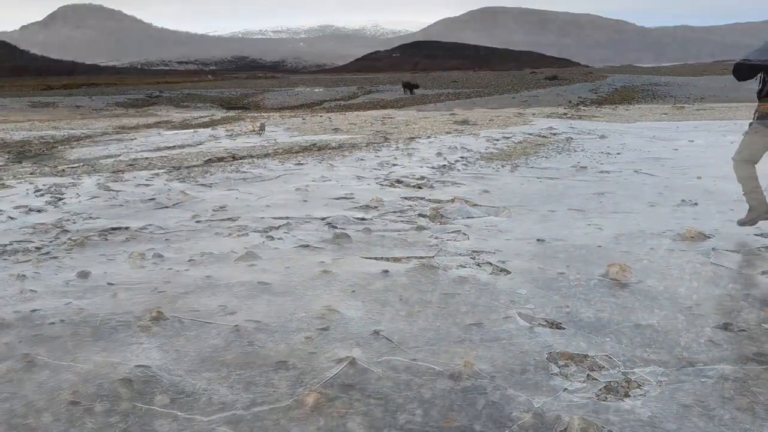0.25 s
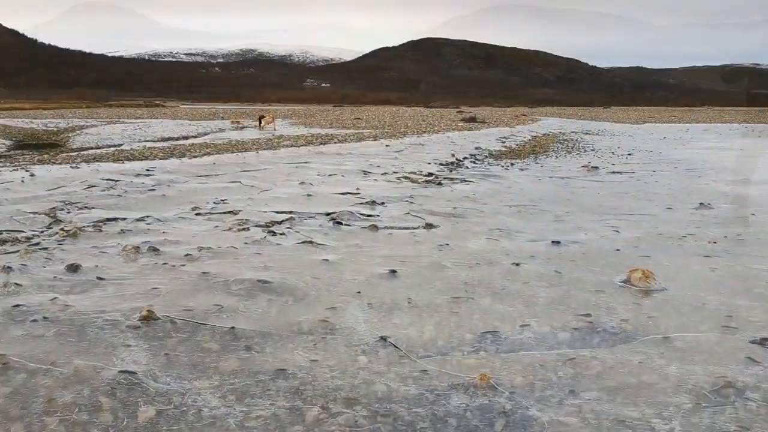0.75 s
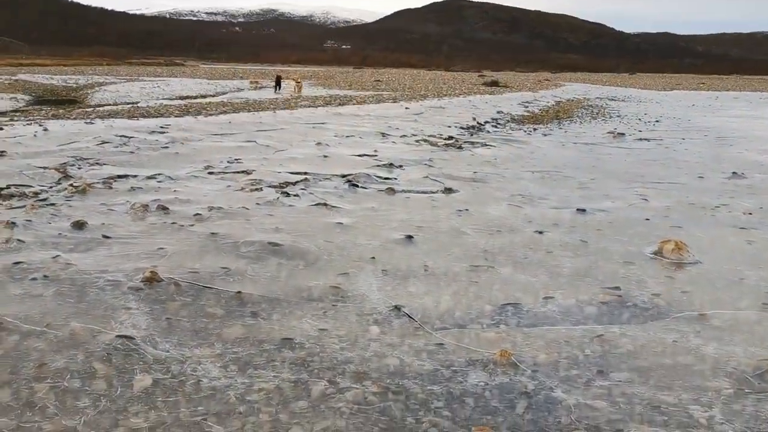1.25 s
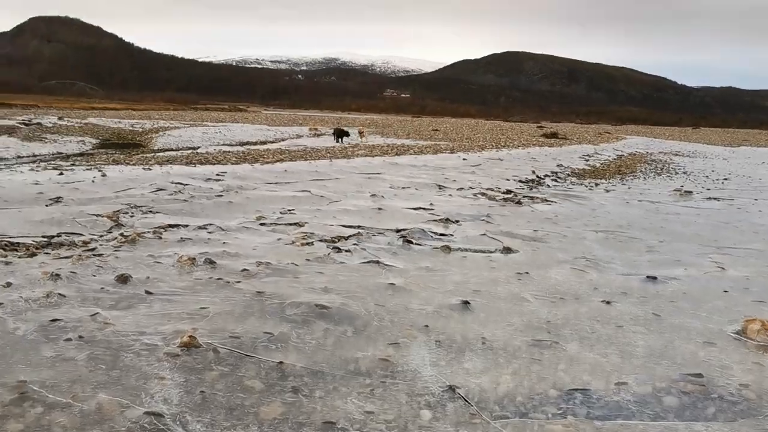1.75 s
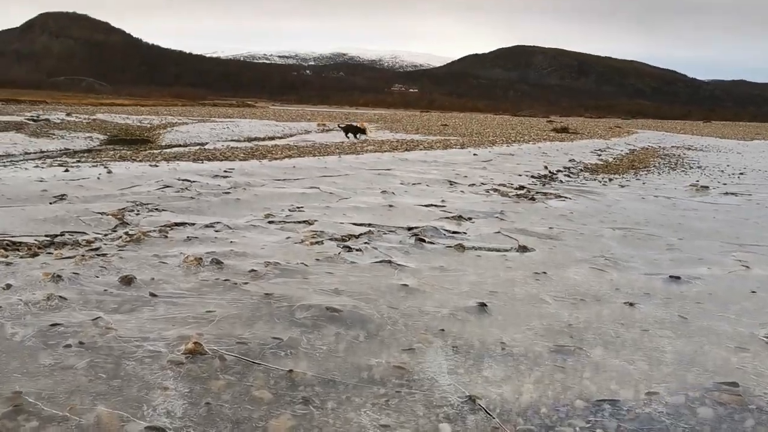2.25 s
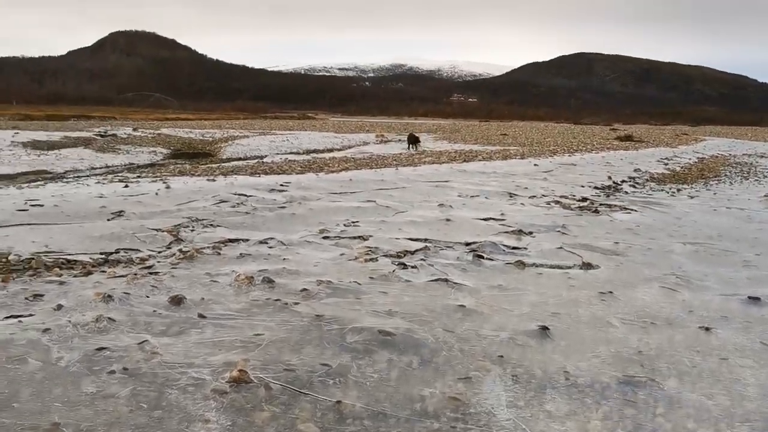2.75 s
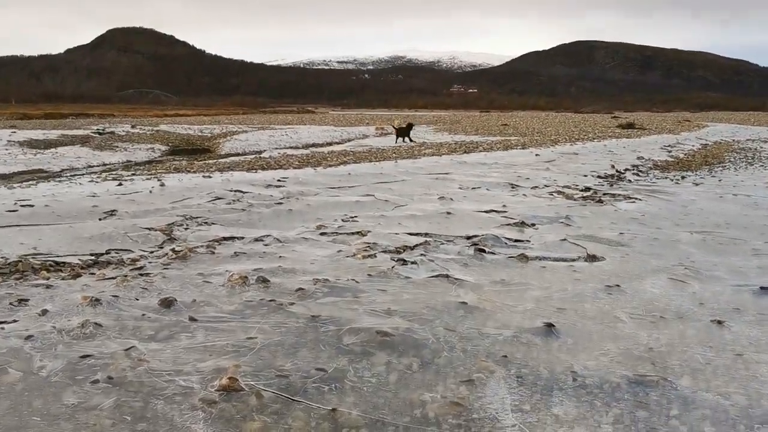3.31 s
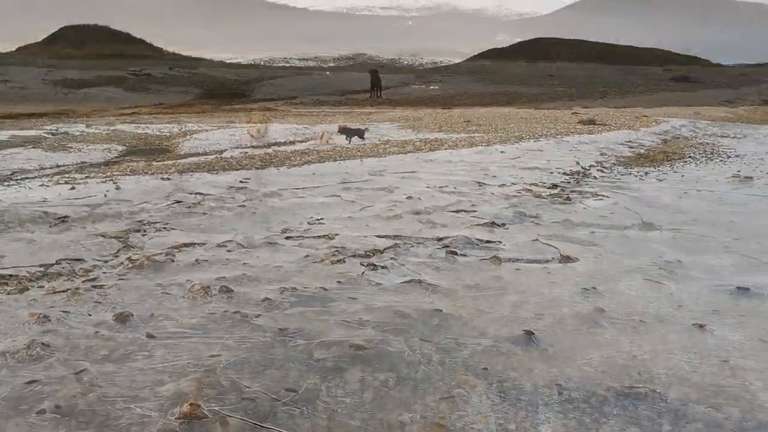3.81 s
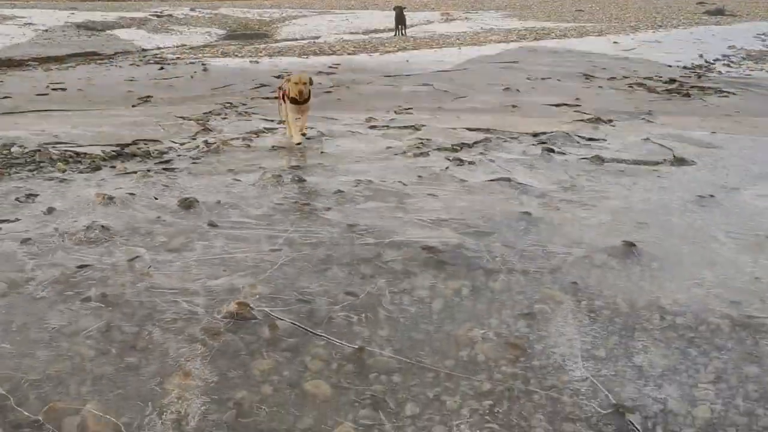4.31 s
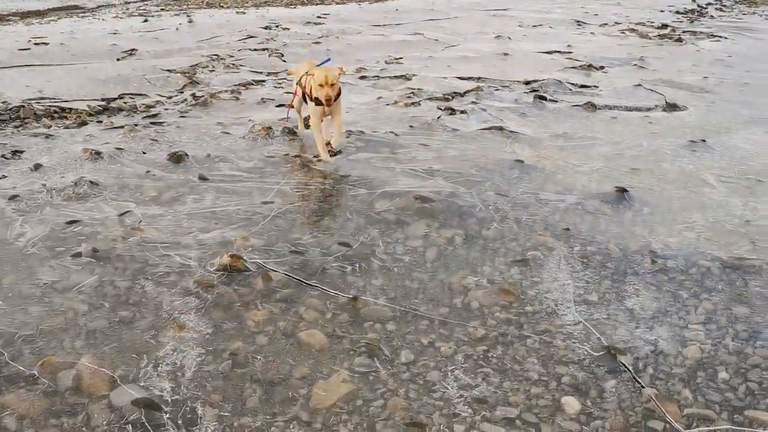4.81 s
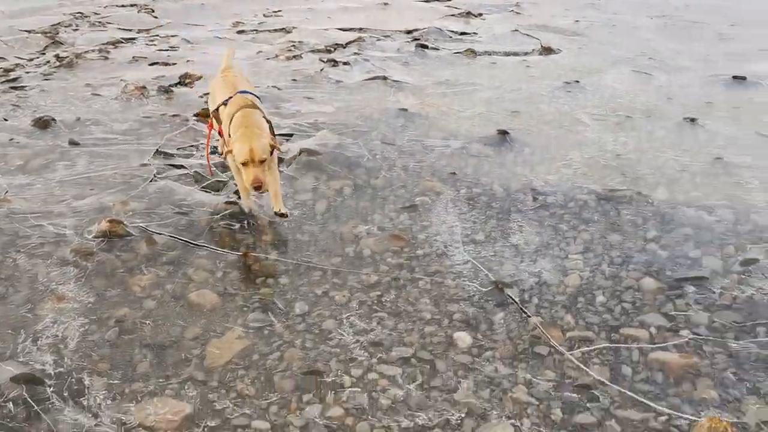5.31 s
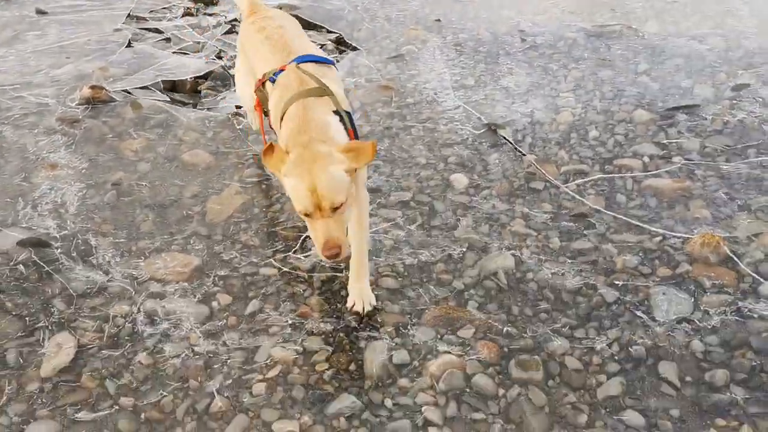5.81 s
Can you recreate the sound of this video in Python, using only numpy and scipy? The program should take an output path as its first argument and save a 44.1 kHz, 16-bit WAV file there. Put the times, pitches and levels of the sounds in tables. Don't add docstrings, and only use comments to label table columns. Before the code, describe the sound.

Thin ice over shallow water cracks and crunches under a walker's boots close by, then splinters more lightly and brightly under a dog's paws.

```python
import sys
import numpy as np
from scipy import signal
from scipy.fft import rfft, irfft, next_fast_len
from scipy.io import wavfile
from scipy.ndimage import uniform_filter1d, map_coordinates

SR = 44100
rng = np.random.default_rng(int(sys.argv[2]) if len(sys.argv) > 2 else 0)


def transcribe(u):
    v = np.clip(np.atleast_2d(u).T, -1, 1)
    q = np.round(v * 32767).astype(np.int16)
    wavfile.write(sys.argv[1], SR, q)


def gain_from_decibels(decibels):
    exponent = np.asarray(decibels, float) / 20
    return 10 ** exponent


N = 267246

HANDOVER = (4, 4.05)

# [t/s, peak level/dB, f/Hz]
BOOT_SLABS = [(0.221, -30, 1330), (0.418, -23.5, 1010), (0.453, -20.5, 816), (0.475, -17.5, 880),
              (0.712, -18.5, 1060), (0.833, -21.5, 1380), (0.872, -24.5, 970), (0.901, -27.5, 804),
              (1.26, -21, 1230), (1.294, -24, 1460), (1.377, -8, 1100), (1.434, -16.5, 1010),
              (1.557, -21, 1670), (1.607, -19, 1090), (1.671, -24, 1105), (1.926, -15, 1030),
              (2.043, -20, 1580), (2.213, -21.5, 1070), (2.236, -24.5, 990), (2.283, -24.5, 1080),
              (2.354, -24.5, 1330), (2.407, -17, 824), (2.434, -10, 1010), (2.55, -19.5, 820),
              (2.668, -20, 810), (2.905, -24, 920), (3.065, -37, 920), (3.451, -19, 1190),
              (3.461, -15, 860), (3.55, -14.5, 1200)]
# [t/s, peak level/dB, f/Hz]
BOOT_CHIPS = [(0.061, -33, 3000), (0.326, -40, 2700), (0.391, -29, 4250), (0.672, -19.5, 4230),
              (1.324, -24, 1700), (1.347, -10, 3975), (1.455, -11.5, 1960), (1.707, -22, 2030),
              (1.773, -26.5, 2220), (1.84, -10, 3900), (2.108, -20, 4100), (2.196, -30.5, 4510),
              (2.574, -23.5, 3020), (2.711, -19.5, 3150), (2.803, -26, 2110), (2.855, -33.5, 2930),
              (2.958, -30.5, 3630), (3.006, -24.5, 2560), (3.117, -36, 2780), (3.146, -32, 3630),
              (3.246, -37.5, 3890), (3.406, -23, 4300), (3.512, -17, 2530), (3.67, -21, 4080),
              (3.696, -16, 4550), (3.737, -21, 2570), (3.882, -25, 2130), (3.895, -26.5, 3440),
              (3.918, -33, 2870), (.264, -46, 6500), (.312, -46, 3710), (1.4424, -18, 1110),
              (1.599, -28, 3830), (1.9096, -23, 1030), (2.341, -34, 4160), (2.393, -38, 3750),
              (2.516, -26, 4650), (2.7816, -33, 1000), (2.8936, -33, 970), (3.4997, -24, 1160)]
# [t/s, peak level/dB, f/Hz]
FROST_SPLINTERS = [
    (.0233, -35, 7550),
    (.0468, -40, 8440),
    (.0792, -35, 9440),
    (.1416, -35, 6860),
    (.1815, -42, 7150),
]
# [t/s, peak level/dB, shard f/Hz]
LATER_CRACKS = [(1.3634, -13, 1210), (1.8553, -11, 3570), (1.864, -10.5, 4080), (1.8744, -12, 3680),
                (1.9545, -19, 4020), (2.4697, -13, 4000), (3.5976, -13.5, 4120), (4.7034, -22, 1370),
                (5.2623, -18, 3110), (5.2782, -17, 4530), (5.288, -16, 2320), (5.3258, -16, 3360),
                (5.6167, -15, 3250), (5.3794, -14.5, 2400), (5.5394, -19, 3760), (5.5794, -23, 3400),
                (5.6456, -16.5, 3290)]
# [t/s, peak level/dB, f/Hz, time to fall 60 dB/s]
PAW_BREAKS = [(4.033, -28.5, 3740, .033), (4.074, -25, 2650, .03), (4.141, -29.5, 2950, .039),
              (4.204, -33, 3470, .044), (4.42, -29, 3410, .06), (4.515, -23.5, 4480, .052),
              (4.636, -21.5, 4570, .044), (4.872, -30, 2810, .048), (4.925, -19, 4020, .044),
              (4.958, -21, 3990, .046), (4.979, -22, 4200, .03), (5.034, -18, 3030, .034),
              (5.07, -19, 3930, .038), (5.247, -14, 3180, .038), (5.364, -16.5, 3220, .052),
              (5.515, -15.5, 3600, .056), (5.795, -14.5, 4500, .056), (5.82, -17.5, 3930, .03),
              (5.932, -16, 4800, .034), (5.964, -15, 4740, .09)]
# [t/s, peak level/dB, f/Hz]
BOOT_HAIRLINES = [(0.0962, -41, 3560), (0.3414, -46, 1280), (0.4688, -21, 921), (0.4844, -19, 991),
                  (0.5087, -17, 3440), (0.5264, -17, 3480), (0.6355, -25, 1360), (0.6964, -18, 1150),
                  (0.7627, -28, 2730), (0.7874, -37, 4580), (0.814, -26, 1100), (0.9462, -37, 3930),
                  (1.0116, -35, 4190), (1.1019, -43, 886), (1.1722, -37, 2030), (1.5179, -24, 1990),
                  (1.7404, -37, 2080), (1.8804, -17, 1040), (2.0038, -24, 4510), (2.0637, -26, 3110),
                  (2.0807, -28, 4420), (2.17, -30, 2890), (2.4134, -14, 947), (2.4414, -14, 1080),
                  (2.4534, -14, 1940), (2.4584, -12, 1060), (2.4864, -19, 797), (2.607, -33, 939),
                  (2.6953, -20, 3220), (2.7387, -24, 2760), (2.7616, -32, 3150), (2.9387, -28, 3390),
                  (3.1797, -41, 2680), (3.1906, -37, 3340), (3.3184, -48, 2830), (3.4664, -17, 762),
                  (3.5344, -14, 1150), (3.5664, -17, 972), (3.5808, -12, 1590), (3.6164, -21, 3400),
                  (3.6334, -25, 4530), (3.6446, -25, 3520), (3.8082, -36, 4410), (3.8571, -29, 2040)]
# [t/s, peak level/dB, f/Hz]
PAW_HAIRLINES = [(3.9963, -40, 3900), (4.0223, -28, 5050), (4.1001, -28, 4330), (4.129, -30, 5050),
                 (4.1544, -28, 4330), (4.1934, -29, 3630), (4.2374, -28, 4270), (4.3246, -33, 5080),
                 (4.374, -30, 2730), (4.4957, -25, 3890), (4.5334, -26, 2020), (4.5531, -31, 4410),
                 (4.5654, -29, 2070), (4.587, -27, 4960), (4.6059, -33, 3110), (4.9062, -19, 2850),
                 (5.1158, -18, 4170), (5.1414, -19, 2880), (5.1751, -21, 2110), (5.4196, -20, 2110),
                 (5.4444, -21, 3650), (5.5648, -17, 3130), (5.7638, -25, 3910), (5.8974, -14, 4390),
                 (6.0227, -27, 4640)]
# [t/s, peak level/dB, f/Hz, time to fall 60 dB/s]
PAW_CRUSHES = [
    (5.318, -12.5, 3400, .04),
    (5.606, -12, 3250, .05),
    (5.712, -10, 4100, .04),
    (5.864, -11, 4500, .1),
]

# [start t/s, swell/s, crunch level/dB, time to fall 60 dB/s, fizz level over crunch/dB]
BOOT_STEPS = [(0, .02, -49, .5, -3), (.385, .15, -29.5, .5, -18), (.545, .04, -39, .25, -2),
              (.61, .08, -32.5, .3, -8), (1.345, .015, -24, .3, -19), (1.375, .02, -24, .3, -21),
              (1.43, .02, -33, .5, -21), (1.5, .13, -35, .33, -19), (1.838, .02, -22.5, .3, -30),
              (1.9, .03, -36, 1.1, -22), (2.095, .024, -36.5, .26, -19), (2.2, .037, -42, .12, -17),
              (2.27, .095, -42, .2, -32), (2.406, .05, -24, .3, -25), (2.54, .03, -46, 1.5, -20),
              (2.655, .03, -35.5, .45, -21), (2.885, .03, -39, .35, -15), (3.444, .155, -26.5, .18, -23),
              (3.63, .04, -40, .65, -30)]
# [start t/s, swell/s, crunch level/dB, time to fall 60 dB/s, fizz level over crunch/dB]
PAW_STEPS = [(4.018, .04, -43, .7, -20), (4.13, .09, -40, 1.1, -17), (4.41, .12, -39, .6, -18),
             (4.625, .03, -36, .35, -16), (4.69, .05, -40, .25, -20), (4.864, .08, -36, .7, -16),
             (5.027, .05, -28.5, 1.3, -22), (5.243, .04, -29, .5, -24), (5.355, .02, -26.5, .3, -24),
             (5.41, .03, -28.5, .5, -24), (5.49, .03, -26, .35, -25), (5.555, .02, -29.5, .4, -25),
             (5.635, .025, -27.5, .45, -25), (5.77, .05, -31, .4, -16), (5.856, .04, -23.5, .12, -16),
             (5.96, .015, -30, .4, -9)]
# [start t/s, swell/s, crunch level/dB, time to fall 60 dB/s, fizz level over crunch/dB]
SETTLING = [
    (.82, .04, -46, 1.6, -26),
    (3.845, .03, -40, .35, -25),
]

# [t/s, peak level/dB, f/Hz, time to fall 60 dB/s]
THUDS = [(0.058, -31, 92, 0.11), (0.383, -23.5, 260, 0.067), (0.593, -27.5, 286, 0.08),
         (1.338, -10, 270, 0.049), (1.343, -17, 105, 0.16), (1.475, -30, 188, 0.08),
         (1.834, -14, 187.6, 0.068), (2.105, -18.5, 226, 0.08), (2.218, -27, 127, 0.052),
         (2.401, -16.5, 201, 0.095), (2.683, -25, 314, 0.088), (3.441, -9, 257, 0.076),
         (3.447, -18, 115, 0.17), (3.501, -12.5, 275, 0.063), (4.918, -27, 223, 0.13),
         (5.028, -24, 199, 0.08), (5.064, -24, 200, 0.08), (5.134, -28, 261, 0.063),
         (5.312, -23, 253, 0.092), (5.496, -23.5, 255, 0.08), (5.712, -23, 160, 0.09),
         (5.756, -24, 218, 0.1), (5.89, -22, 280, 0.11), (5.962, -25, 300, 0.07)]
# [start t/s, swell/s, level/dB, time to fall 60 dB/s]
SAGS = [(.383, .03, -31, .5), (.55, .16, -42, .9), (.84, .05, -44, 4), (1.45, .05, -38.5, 1.6),
        (1.9, .1, -45, 2), (2.19, .047, -28, .3), (2.27, .05, -38, .7), (2.55, .1, -48, 1.5),
        (2.86, .05, -44, .45), (3.44, .05, -30, .6), (3.83, .045, -47, .6), (4.45, .1, -52, .9),
        (5.1, .1, -42, 1.5), (5.52, .05, -38, 1.5), (5.71, .06, -34, 1.5), (5.86, .03, -30.5, .5)]
# [t/s, f/Hz, level/dB]
FLOE_GROAN = [
    (5.76, 120, -52),
    (5.8, 105, -35),
    (5.84, 115, -46),
    (5.885, 150, -42),
    (5.91, 118, -30),
    (5.955, 128, -38),
    (5.995, 152, -27),
    (6.02, 160, -38),
    (6.06, 150, -48),
]

# [f/Hz, level per Hz/dB]
BOOT_ICE = [(880, -36.5), (1500, -3.5), (2320, -3), (4130, -1), (4790, -1.5), (5450, -13.5), (9000, -34),
            (11700, -71), (19800, -120)]
# [f/Hz, level per Hz/dB]
PAW_ICE = [(900, -30), (1400, -10.5), (2070, -3.5), (2730, -4.5), (3170, -3.5), (4320, 1.5), (5200, -5.5),
           (6200, -24.5), (9000, -31.5), (12000, -66)]
# [f/Hz, level per Hz/dB]
SLAB_COLOUR = [(260, -23), (450, -3.5), (556, -1.5), (1030, 2), (1500, -5), (1950, -30), (3300, -120)]
# [f/Hz, level per Hz/dB]
FIZZ_COLOUR = [(4120, -29), (7000, -1), (9660, -11.5), (11200, -14), (14400, -13), (15400, -29),
               (16300, -42)]
# [f/Hz, level per Hz/dB]
SHEET_COLOUR = [(35, -40), (60, -17.5), (119, 1), (291, -0.5), (360, -7.5), (500, -14), (650, -39),
                (1100, -120)]

# [f/Hz, likeness 0 to 1]
BOOT_ALIKE = [(100, .995), (700, .98), (1400, .92), (3100, .72), (15000, .25)]
# [f/Hz, likeness 0 to 1]
PAW_ALIKE = [(100, .995), (700, .97), (1500, .89), (3100, .6), (15000, .1)]
# [f/Hz, level/dB]
BOOT_SIDE = [(60, 8), (150, 3.0), (380, 5.5), (950, 2), (2380, -10), (5980, -7.5), (15000, 3)]
# [f/Hz, level/dB]
PAW_SIDE = [(60, 0), (150, 0.0), (380, -1.5), (950, 1), (1500, 0.4), (2380, -3.5), (5980, -8.5), (15000, 1)]
# [t/s, delay/ms]
ICE_ECHO = [(4.1, 1.09), (4.4, 1.06), (4.9, 1.03), (5.35, 0.94), (5.8, 0.8), (6.06, 0.66)]
# [f/Hz, level/dB]
RIVER_BED = [(250, 1), (430, -2), (600, 1.5), (770, -3), (1150, 4), (1520, 1), (1850, 2.5), (2600, 1)]

# [t/s, level/dB]
WIND = [(0.02, -62), (0.08, -46), (0.17, -65), (0.23, -55), (0.49, -52), (1.22, -62), (2.05, -58),
        (2.11, -52), (3.2, -77.0), (3.4, -62), (3.5, -54), (3.75, -60), (3.85, -50), (4.3, -52), (4.7, -60),
        (5.05, -70), (5.55, -67), (6.05, -59)]
# [f/Hz, level per Hz/dB]
WIND_COLOUR = [(12, -34), (20, -8.5), (43, 6), (110, -8), (140, -35), (240, -120)]
# [f/Hz, level per Hz/dB]
HISS_COLOUR = [(59, -31), (100, 5), (343, -6.5), (1480, -2.5), (4020, -8), (8280, -22), (16000, -28)]

TOUCH_S, TOUCH_DB = .012, -13
REST_DB, REST_FIZZ_DB, REST_SHEET_DB = -65, -33, -66
BOOT_BODY_DB = -3
PAW_BODY_DB, PAW_BODY_DB_PER_S = -4, -3


def ice():
    crunch_db, body_db, fizz_db, sheet_db = load()
    crack, shards = fractures()
    start, end = HANDOVER
    paws = np.clip((np.arange(N) / SR - start) / (end - start), 0, 1)
    speckle = tinted(noise(), depth_db=3.6)
    fine = grit(bed=0.8)
    coarse = np.hypot(0.8 * fine, 0.77 * grit(bed=0.41))
    force = np.hypot(gain_from_decibels(crunch_db - 3.5) * fine, crack)
    snap = snaps()
    mids = force * speckle + snap

    slab_force = np.hypot(gain_from_decibels(crunch_db - 5.0) * coarse, 1.11 * crack)
    slabs = slab_force * gain_from_decibels(body_db + 2.07 * paws) * speckle
    body = filtered(slabs + gain_from_decibels(3) * snap, causal(SLAB_COLOUR))
    fizz = np.hypot(force, 0.33 * crack) * gain_from_decibels(fizz_db + 0.5) * speckle
    highs = filtered(fizz, causal(FIZZ_COLOUR))
    flex = gain_from_decibels(sheet_db - 3 + 2.7 * wobble(25)) * noise()
    lows = filtered(flex, causal(SHEET_COLOUR)) + thuds() + groan()
    loose = clinks(gain_from_decibels(crunch_db - 12.5), rate=200, cycles=22)
    scattered = np.array([loose, np.roll(loose, 23), np.roll(loose, 40)])
    common = body + highs + lows + shards + scattered

    boot = np.sqrt(1 - paws) * (filtered(mids, causal(BOOT_ICE)) + common)
    paw = np.sqrt(paws) * (filtered(mids, causal(PAW_ICE)) + common)
    paw = filtered(paw, lambda hz: gain_from_decibels(along(RIVER_BED, hz)))
    walker = placed(boot, BOOT_ALIKE, BOOT_SIDE, lead_s=-0.000053)
    dog = placed(paw, PAW_ALIKE, PAW_SIDE, lead_s=0.00033)
    dog = mirrored(dog, strength=np.array([[.35], [.75]]))
    return gain_from_decibels(1.0) * (walker + dog)


def fractures():
    power, shards = np.zeros(N + SR), np.zeros((3, N + SR))
    for s, db, hz, t60, rise in cracks():
        t = np.arange(round((t60 + rise) * SR)) / SR
        at = slice(round(s * SR), round(s * SR) + len(t))
        fade = gain_from_decibels(db - 60 * np.maximum(t - rise, 0) / np.clip(t60, .004, .25))
        onset = np.minimum(t / rise, 1)
        punch = 0.63 + 0.56 * gain_from_decibels(-60 * t / 0.0054)
        fall = fade * onset * punch
        power[at] += (gain_from_decibels(-9.5) * fall) ** 2
        ring = signal.lfilter(*signal.iirpeak(hz, 5.5, SR), fall * rng.standard_normal((3, len(t))))
        shards[:, at] += ring * gain_from_decibels(-8.5) * np.sqrt(SR / hz)
        shards[:, at] -= gain_from_decibels(-4.0) * fall * gain_from_decibels(-60 * t / 0.026) * np.sin(2 * np.pi * hz * t)
    return np.sqrt(power[:N]), shards[:, :N]


def cracks():
    sharp_s, crush_s = .00039, .009
    kinds = (BOOT_SLABS, .036), (BOOT_CHIPS, .026), (FROST_SPLINTERS, .015), (LATER_CRACKS, .021)
    sharp = [(*row, t60) for rows, t60 in kinds for row in rows]
    sharp += PAW_BREAKS
    sharp += [(s, db - 3.5, hz, .016) for s, db, hz in BOOT_HAIRLINES + PAW_HAIRLINES]
    return [(*row, sharp_s) for row in sharp] + [(*row, crush_s) for row in PAW_CRUSHES]


def snaps():
    out = np.zeros(N)
    for s, db, *_ in cracks():
        out[round(s * SR)] = -gain_from_decibels(db - 9) * (s < HANDOVER[0])
    return out


def load():
    steps = np.array(BOOT_STEPS + PAW_STEPS + SETTLING)
    start = steps[:, 0]
    power, rest = swells(steps), gain_from_decibels(REST_DB) ** 2
    total = power.sum(0) + rest
    fizz = gain_from_decibels(steps[:, 4]) ** 2 @ power + gain_from_decibels(REST_FIZZ_DB) ** 2 * rest
    fizz_db = 10 * np.log10(fizz / total)

    paw_body = PAW_BODY_DB + PAW_BODY_DB_PER_S * (start - HANDOVER[0])
    body = np.where(start < HANDOVER[0], BOOT_BODY_DB, paw_body)
    body[-len(SETTLING):] = -11
    body_db = (body @ power + BOOT_BODY_DB * rest) / total

    flex = [(s, TOUCH_S, db - 12, .18) for s, db, _, _ in THUDS]
    sheet = swells(flex + SAGS).sum(0) + gain_from_decibels(-21) ** 2 * total + gain_from_decibels(REST_SHEET_DB) ** 2
    rows = 10 * np.log10(total), body_db, fizz_db, 10 * np.log10(sheet)
    return [np.interp(np.arange(N) / 32, np.arange(len(total)), r) for r in rows]


def swells(rows):
    s, rise, db, t60 = np.transpose(rows)[:4, :, None]
    t = np.arange(0, N + 32, 32) / SR - s
    shape_db = TOUCH_DB * np.clip(1 - t / rise, 0, 1) - 60 * np.maximum(t - rise, 0) / t60
    return (gain_from_decibels(db + shape_db) * np.clip(t / TOUCH_S, 0, 1)) ** 2


def grit(bed):
    return np.sqrt(swarm(260, spread_db=3, t60=.016) ** 2 + bed)


def swarm(rate, spread_db, t60):
    draw = rng.random((2, N))
    size = gain_from_decibels(-spread_db * np.log(draw[1] + 0.07)) ** 2
    starts = (draw[0] < rate / SR) * size
    power = signal.lfilter([1], [1, -gain_from_decibels(-120 / (t60 * SR))], starts)
    return unit(np.sqrt(np.abs(power)))


def tinted(x, depth_db):
    z = signal.stft(x, nperseg=128)[2]
    field = rng.standard_normal(z.shape[1:])
    field = uniform_filter1d(field, size=3, axis=0)
    field = uniform_filter1d(field, size=6, axis=1)
    gain = gain_from_decibels(depth_db * unit(field))
    return signal.istft(z * unit(gain), nperseg=128)[1][:, :N]


def clinks(level, rate, cycles):
    rows = rng.random((int(rate * N / SR), 3))
    start = (rows[:, :1] * N).astype(int)
    hz = 900 * 5.94 ** rows[:, 1:2]
    k = np.arange(700)
    size_db = -3.5 * np.log(rows[:, 2:] + 0.062)
    tone = gain_from_decibels(size_db - 60 * hz * k / SR / cycles) * np.sin(2 * np.pi * hz * k / SR)
    return unit(np.bincount((start + k).ravel(), tone.ravel(), N + len(k))[:N]) * level


def thuds():
    out, t = np.zeros(N + SR), np.arange(SR // 3) / SR
    for s, db, hz, t60 in THUDS:
        drift = 0.16 * np.cumsum(rng.standard_normal(len(t))) * np.sqrt(hz / SR)
        turns = hz * t * (1 - 1.2 * t) + drift
        swing = -np.sin(2 * np.pi * turns) * np.minimum(t / 0.00093, 1)
        fade = gain_from_decibels(db - 3.5 - 60 * t / np.clip(t60, .02, .4))
        out[round((s + .007) * SR):][:len(t)] += fade * swing
    return out[:N]


def groan():
    hz, db = curves(FLOE_GROAN)
    t = np.arange(N) / SR
    turns = np.cumsum(hz * (1 + .04 * wobble(40))) / SR
    fade_in = np.clip((t - FLOE_GROAN[0][0]) / .02, 0, 1)
    return gain_from_decibels(db + 3.1) * fade_in * np.sin(2 * np.pi * turns)


def placed(three, alike, side, lead_s):
    m, half = next_fast_len(N + SR // 10), np.array([[.5], [-.5]])
    hz, z = np.fft.rfftfreq(m, 1 / SR), rfft(three, m)
    share = np.clip(along(alike, hz), 0, 1)
    mixed = np.sqrt(share) * z[0] + np.sqrt(1 - share) * z[1:]
    balance = gain_from_decibels(half * along(side, hz))
    lead = np.exp(2j * np.pi * hz * half * lead_s)
    return irfft(mixed * balance * lead, m)[:, :N]


def mirrored(pair, strength):
    delay = (curves(ICE_ECHO)[0] + .02 * wobble(12)) * SR / 1000
    late = np.array([map_coordinates(side, [np.arange(N) - delay]) for side in pair])
    echo = filtered(late, lambda hz: 1 / (1 + (900 / (hz + 1)) ** 4) / (1 + (hz / 5200) ** 8))
    return pair + strength * echo


def air():
    buffet_db, = curves(WIND)
    shared, left, right = rng.standard_normal((3, N))
    pair = np.array([1.6 * shared + 0.64 * left, 0.53 * shared + 0.53 * right])
    gusts = unit(filtered(pair, causal(WIND_COLOUR)))
    hiss = unit(filtered(rng.standard_normal((2, N)), causal(HISS_COLOUR)))
    return gain_from_decibels(buffet_db + 1.0 + 3.8 * wobble(2.3)) * gusts + gain_from_decibels(-66) * hiss


def noise():
    return rng.standard_normal((3, N))


def unit(x):
    return x / np.sqrt(np.mean(x ** 2) + 1e-20)


def along(points, hz):
    f, v = np.transpose(points)
    return np.interp(np.log(hz + 1), np.log(f + 1), v)


def curves(rows):
    s, *cols = np.transpose(rows)
    return [np.interp(np.arange(N) / SR, s, c) for c in cols]


def wobble(rate):
    return map_coordinates(rng.standard_normal(int(N * rate / SR) + 4), [np.arange(N) * rate / SR])


def filtered(x, response):
    m = 2 * next_fast_len(N // 2 + SR // 8)
    return irfft(rfft(x, m) * response(np.fft.rfftfreq(m, 1 / SR)), m)[..., :N]


def causal(spectrum):
    size = 2 ** 13
    gain = gain_from_decibels(np.maximum(along(spectrum, np.fft.rfftfreq(size, 1 / SR)), -70))
    cep = irfft(np.log(gain / np.sqrt(np.mean(gain ** 2))))
    cep[1:size // 2] *= 2
    cep[size // 2 + 1:] = 0
    return lambda hz: rfft(irfft(np.exp(rfft(cep))), 2 * len(hz) - 2)


def scene():
    return ice() + air()


def roll_off(x):
    return signal.sosfilt(signal.butter(12, 16300, fs=SR, output="sos"), x)


def record(dry):
    dry = signal.lfilter(*signal.butter(2, 38, "high", fs=SR), dry)
    dry = filtered(dry, lambda hz: hz < 16000)
    mix = dry / (1 + np.abs(dry / 0.9) ** 3) ** (1 / 3)
    return roll_off(mix)


dry = scene()
out = record(dry)
transcribe(out)
```